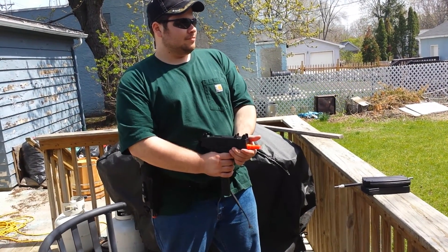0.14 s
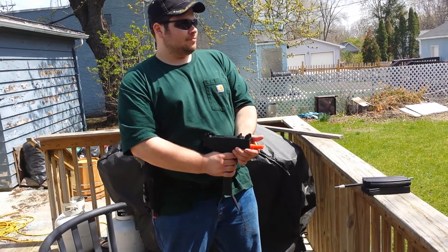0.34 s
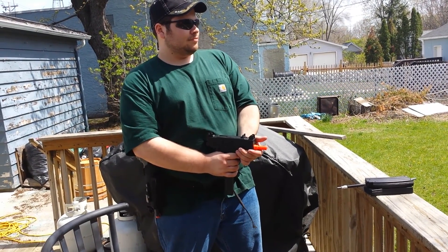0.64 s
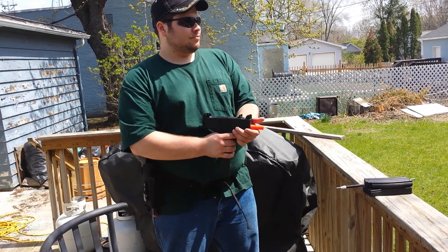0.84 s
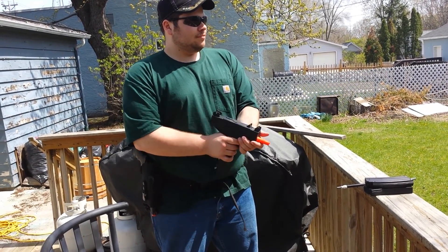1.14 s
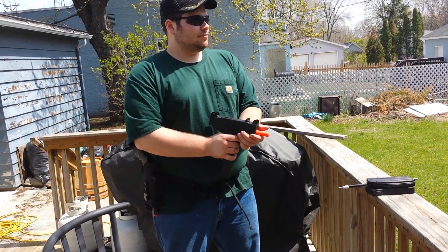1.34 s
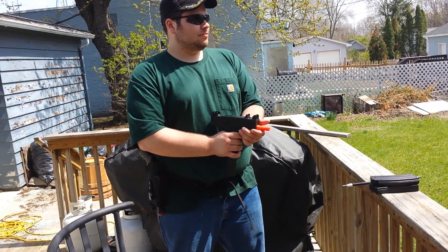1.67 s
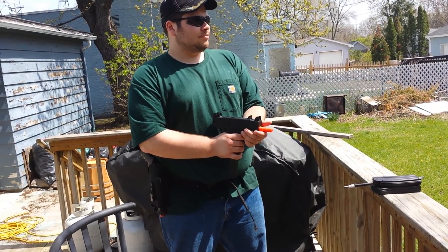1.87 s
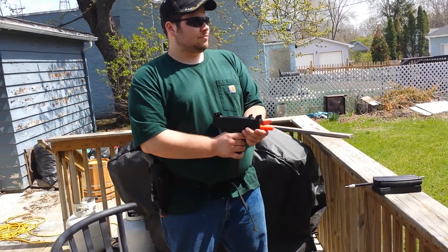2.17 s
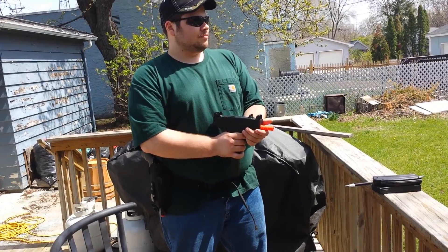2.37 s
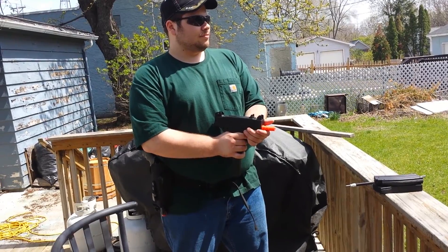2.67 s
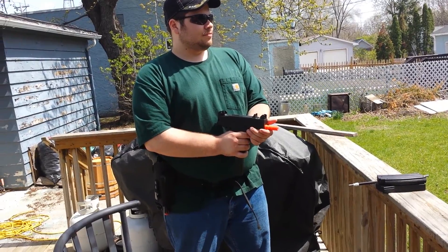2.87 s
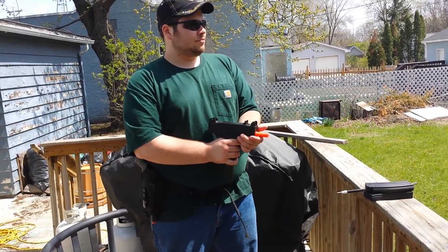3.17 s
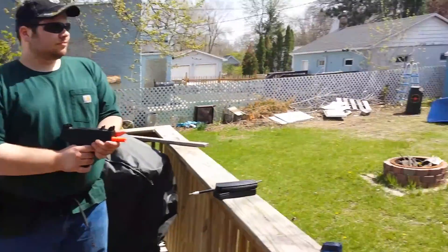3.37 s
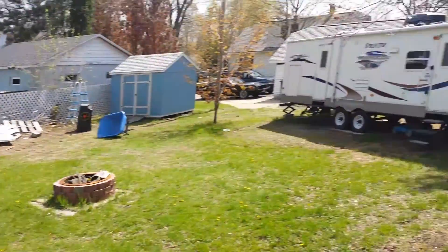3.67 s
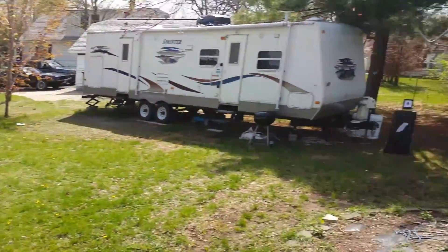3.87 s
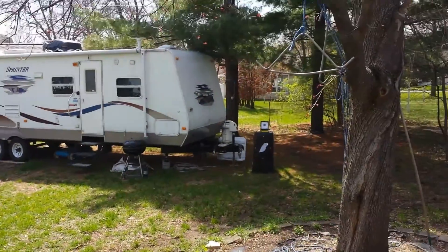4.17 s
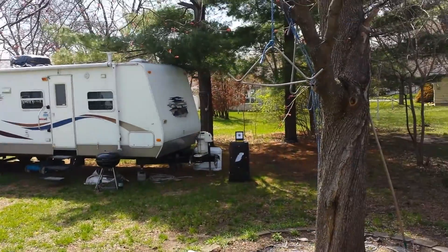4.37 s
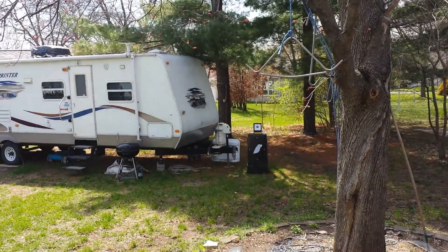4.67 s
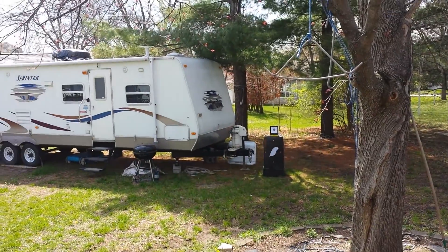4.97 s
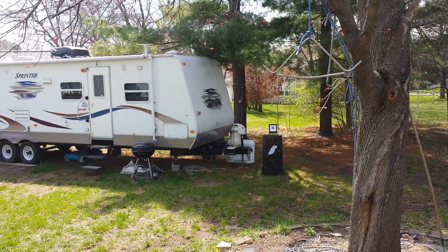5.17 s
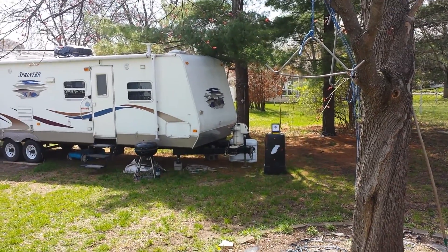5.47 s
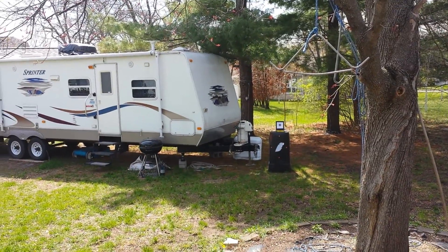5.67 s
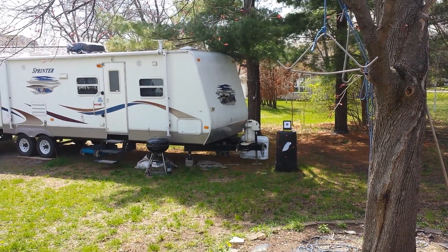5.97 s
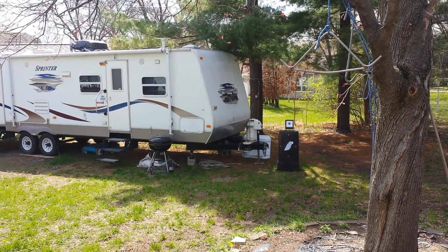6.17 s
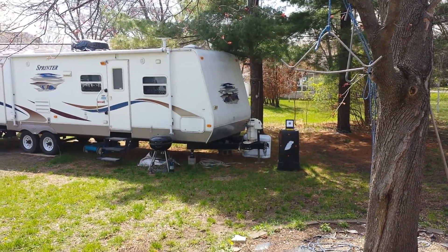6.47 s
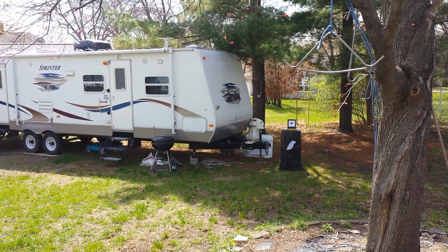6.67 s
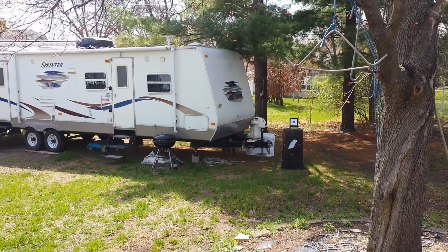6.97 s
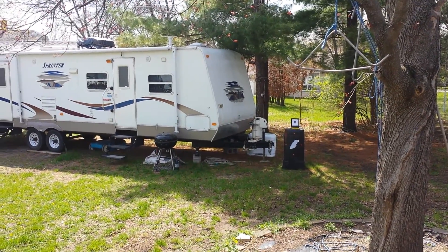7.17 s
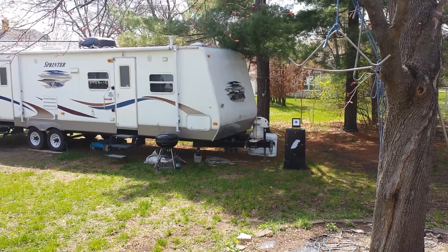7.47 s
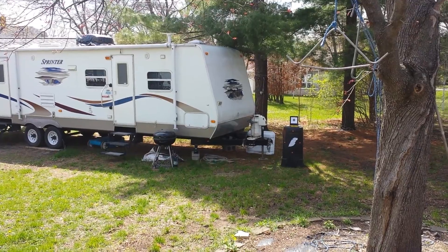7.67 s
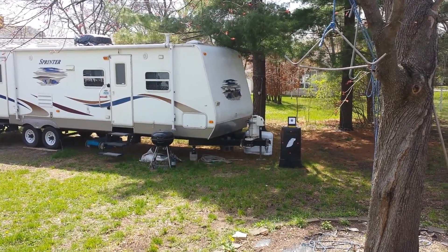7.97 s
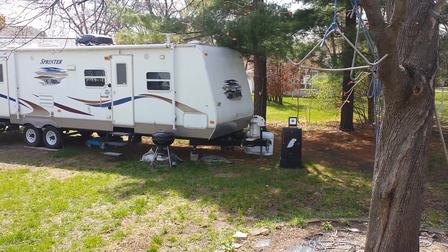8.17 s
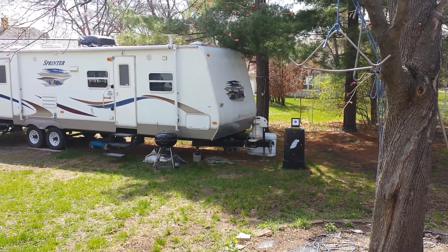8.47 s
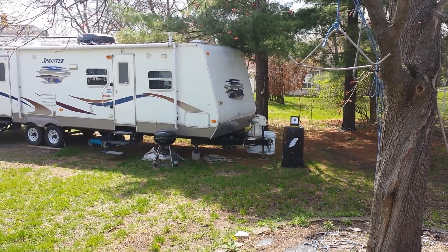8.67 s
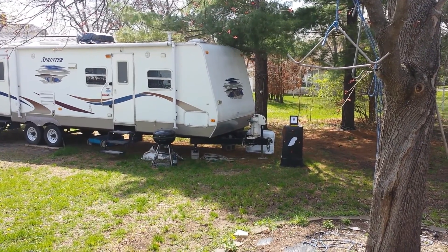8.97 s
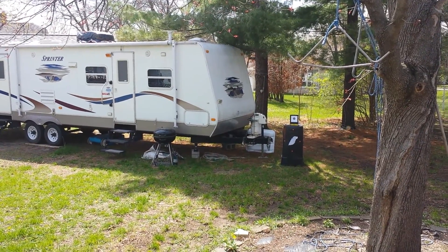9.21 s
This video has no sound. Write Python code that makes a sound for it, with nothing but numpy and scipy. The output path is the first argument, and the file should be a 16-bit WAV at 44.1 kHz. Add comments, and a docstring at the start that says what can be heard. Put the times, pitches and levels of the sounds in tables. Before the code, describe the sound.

Five bursts of toy-gun fire, the second by far the longest, separated by pauses under a second. Piston cracks ring through a plastic shell with nozzle clicks, chattering gear teeth and a nasal motor whine. Spinning gears hiss in the gaps, loudest in the first. Walls and trees give a short wash. The nearby camera turns from the gun around four seconds, dulling its edge and leaning the whine left; tiny hard ticks appear late.

```python
"""A deck in a backyard, where a small electric airsoft gun fires bursts at about eight shots a second.
In each cycle the gears whine while they wind the spring, the nozzle clicks and the piston slams home.
Walls, fence and trees return a diffuse wash; between bursts the gear train seems to spin free, hissing.
Midway the camera, with its two-port microphone, turns away from the gun. Gears, hiss and air are shaped
noise; clicks and shots are noise bursts ringing through resonances of the plastic shell."""
import sys
import numpy as np
from scipy import signal
from scipy.fft import rfft, irfft, next_fast_len
from scipy.io import wavfile
from scipy.ndimage import uniform_filter1d, map_coordinates

SR = 44100
rng = np.random.default_rng(int(sys.argv[2]) if len(sys.argv) > 2 else 0)


def generate_wav(sig):
    """Save sig (samples, or channels by samples) to the path in sys.argv[1] as 16-bit PCM at SR."""
    pcm = np.round(np.clip(np.atleast_2d(sig).T, -1, 1) * 32767).astype(np.int16)
    wavfile.write(sys.argv[1], SR, pcm)


N = 411978


def amp(db):
    """Decibels to gain."""
    return 10 ** (np.asarray(db) / 20)


def unit(x):
    """Scale to rms 1."""
    return x / np.sqrt(np.mean(x ** 2) + 1e-20)


def colour(points, hz):
    """Gain of (Hz, dB) points on a log frequency axis."""
    point_hz, db = np.transpose(points)
    return amp(np.interp(np.log(hz + 1), np.log(point_hz), db))


def curve(rows):
    """One value per sample from (s, value) rows."""
    return np.interp(np.arange(N) / SR, *np.transpose(rows))


def wobble(rate):
    """A smooth random curve with rate knots a second."""
    knots = rng.standard_normal(int(N * rate / SR) + 4)
    return map_coordinates(knots, [np.arange(N) * rate / SR])


def filtered(x, response):
    """x times a complex response of frequency."""
    size = next_fast_len(N + SR // 2)
    spectrum = rfft(x, size) * response(np.fft.rfftfreq(size, 1 / SR))
    return irfft(spectrum, size)[..., :N]


def ringing(modes, hz):
    """Causal response of (Hz, width Hz, dB) resonances, alternating in sign."""
    total = 0
    for k, (centre, width, db) in enumerate(modes):
        damping = 1j * hz * width
        total = total + (-1) ** k * amp(db) * damping / (centre * centre - hz * hz + damping)
    return total


def add(track, sound, s):
    """Mix a sound in from time s on."""
    start = round(s * SR)
    sound = sound[..., max(0, -start):N - start]
    track[..., max(0, start):max(0, start) + sound.shape[-1]] += sound


# Tone of the open air around the deck. Each row: frequency in Hz, level in dB.
AIR_COLOUR = [(25, -16), (100, -0.5), (200, -7), (500, -10), (1000, -9), (3000, -14), (7000, -8),
              (14000, -32)]
# Level of the background rumble over time, held lower during the long hiss.
# Each row: time in seconds, level in dB before a fixed gain.
AIR_LEVEL = [(0, -64), (1.1, -63), (1.35, -68), (1.65, -67), (1.9, -63), (3.5, -63), (4.5, -61.5),
             (9.34, -61.5)]


def air():
    """Faint open-air rumble and leaves: coloured noise, partly shared by both ports, slowly wavering."""
    shared, left, right = rng.standard_normal((3, N))
    noise = unit(filtered(shared + 0.63 * np.array([left, right]), lambda hz: colour(AIR_COLOUR, hz)))
    breeze_db = 2 * wobble(9)
    return amp(curve(AIR_LEVEL) + breeze_db + 5.55) * noise


# Sharp ticks, as of pellets striking something hard. Each row: start in seconds, level in dB.
PELLETS = [(8.844, -10.5), (9.098, -12), (9.2006, -4)]


def pellets(t60):
    """Thin, bright ticks: noise dying by 60 dB in t60 seconds, through three high resonances."""
    out = np.zeros((2, N))
    t = np.arange(SR // 25) / SR
    for s, db in PELLETS:
        add(out, amp(db - 60 * t / t60) * rng.standard_normal((2, len(t))), s)
    hard_surface = [(3070, 840, -4.5), (7400, 1100, 3), (10310, 4100, -5.5)]
    return filtered(out, lambda hz: ringing(hard_surface, hz))


def thump(s, db, hz, width, body_db):
    """A low, soft thump with one shot: a single swing of pressure and a shorter, higher knock."""
    t = np.arange(N) / SR - s

    def swing(times):
        """One sine swing under a bell, sped up by times."""
        return -np.sin(2 * np.pi * hz * times * t) * np.exp(-(t * times / width) ** 2)

    left_right_db = [[3], [-7]]
    return amp(db) * (swing(0.86) + amp(body_db) * swing(3.2)) * amp(left_right_db)


# Spells of free spinning between bursts. Each row: start in seconds, end in seconds, then the level
# at the start and at the end in dB, before the gains for facing and turned.
FREE_SPIN = [(1.125, 1.196, -46, -58.5), (1.246, 1.673, -29.5, -36.5), (4.922, 5.261, -37.5, -42),
             (6.916, 7.272, -37, -39), (8.18, 8.437, -44.5, -41)]
SPIN_RISE_S, SPIN_DROP_DB, SPIN_TAIL_T60 = 0.055, -2.5, 0.41  # swell, step at the end, 60 dB tail in s


def spin_level():
    """Each spell of free spinning swells, sags slowly, then drops to a fading echo."""
    t = np.arange(N) / SR
    level = 0
    for start, end, start_db, end_db in FREE_SPIN:
        swell = np.clip((t - start) / SPIN_RISE_S, 0, 1)
        sag_db = curve([(start, start_db), (end, end_db)])
        tail_db = (t > end) * (SPIN_DROP_DB - 60 * (t - end) / SPIN_TAIL_T60)
        level = level + swell * amp(sag_db + tail_db)
    return level


# Tone of the rasp with the gun in front of the microphone. Each row: frequency in Hz, level in dB.
RASP_FRONT = [(300, -68), (700, -47), (1100, -20), (1700, -20), (2200, -6), (2800, -20), (3900, -20),
              (5300, -4), (6400, -1.5), (7600, -6.5), (9000, -11.5), (12000, -15.5), (15000, -26)]
# Tone of the rasp with the gun behind it. Each row: frequency in Hz, level in dB.
RASP_BEHIND = [(300, -20.5), (700, -26), (1000, -14.5), (1600, -14), (2150, 0.5), (2700, -5), (3400, -13.5),
               (4100, -10.5), (4550, -0.5), (5000, -3), (6500, 2.5), (7600, -3.5), (8400, 0.5), (9500, -7),
               (15000, -17.5)]


def free_spin(turned, flutter_db, surge_db):
    """Unloaded gears skim their teeth in a fluttering hiss, made of coloured noise."""
    level = spin_level() * amp(surge_db * wobble(22))
    shared, left, right = rng.standard_normal((3, N))
    sides = np.array([left, right])
    front = unit(filtered(shared + 1.23 * sides, lambda hz: colour(RASP_FRONT, hz)))
    behind = unit(filtered(sides, lambda hz: colour(RASP_BEHIND, hz)))
    hiss = amp(5.0) * (1 - turned) * front + amp(6.0) * turned * behind
    return level * amp(flutter_db * wobble(120)) * hiss


# Trigger pulls. Each row: first click, first shot and last shot in seconds, gear whine in dB before
# the motor's other gains, unloaded mesh pitch in Hz. The shots between are evenly spaced.
BURSTS = [(-0.02, 0.0018, 0.961, -43, 2345), (1.9208, 1.9577, 4.8501, -38.5, 2325),
          (5.452, 5.479, 6.8082, -41.5, 2250), (7.3205, 7.3484, 8.0786, -41, 2277),
          (8.5009, 8.5311, 9.2609, -41, 2234)]
CYCLE_S = 0.121  # one turn of the gearbox, roughly
CLICK_LEAD_S = 0.023  # after the first shot, the nozzle clicks this long before the piston lands


def cycles():
    """The gearbox turns at a steady rate through each burst: rows of (click s, shot s)."""
    rows = []
    for first_click, first, last, *_ in BURSTS:
        shots = np.linspace(first, last, round((last - first) / CYCLE_S) + 1)
        clicks = np.append(first_click, shots[1:] - CLICK_LEAD_S)
        rows += zip(clicks, shots)
    return np.array(rows)


# Loudness of the gun at the camera, for motor and blows. Each row: time in seconds, level in dB.
GUN_LEVEL = [(0, 0), (3.4, -0.5), (3.75, -0.6), (4.1, -3), (4.4, -4.5), (4.85, -5), (5.8, -2), (6.8, -2),
             (7.7, -3.7), (9.3, -2.5)]
RUN_ON_S, MOTOR_RISE_S, MOTOR_FALL_S = 0.071, 0.05, 0.024  # run-on after the last shot, start, stop


def motor_level():
    """The motor starts with the first click of a burst and runs on briefly after the last shot."""
    t = np.arange(N) / SR
    running = 0
    for start, _, last, db, _ in BURSTS:
        rise = np.clip((t - start) / MOTOR_RISE_S, 0, 1)
        fall = np.clip(1 - (t - last - RUN_ON_S) / MOTOR_FALL_S, 0, 1)
        running = running + amp(db) * rise * fall
    return running * amp(curve(GUN_LEVEL))


GEAR_TURN_S, GEAR_TIGHT_S = 0.034, 0.04  # off-centre gear: one turn, tightest mesh before the shot


def gears(turned, sag, width_hz, load_db, ripple_db, waver):
    """A rough mesh tone that sinks and swells as the spring is wound, and recovers at each shot."""
    t = np.arange(N) / SR
    fired = cycles()[:, 1]
    to_next = np.append(fired, 100)[np.searchsorted(fired, t)] - t  # seconds to the next shot
    load = uniform_filter1d(np.clip(1.3 - to_next / .11, 0, 1), size=200)
    # the off-centre gear makes level and pitch swing a few times a cycle
    tight = np.cos(2 * np.pi * (to_next - GEAR_TIGHT_S) / GEAR_TURN_S)
    free_hz = curve([(s, hz) for start, _, last, _, hz in BURSTS for s in (start, last)])
    phase = 2 * np.pi * np.cumsum(free_hz * (1 - sag * load - waver * tight)) / SR
    # uneven teeth spread the tone into a narrow band
    teeth = unit(filtered(rng.standard_normal((2, 3, N)), lambda hz: 1 / (1 + (hz / width_hz) ** 2)))
    shared, left, right = unit(teeth[0] * np.cos(phase) + teeth[1] * np.sin(phase))
    # the whine leans to the left port, more so once turned
    lean = amp(np.array([[1], [-1]]) * (2.0 + 4.2 * turned))
    whine = unit(shared + 0.21 * np.array([left, right])) * lean
    # the housing hums under the gears
    hum_modes = [(533, 57, -7.0), (1146, 33, -2.0)]
    housing = unit(filtered(rng.standard_normal(N), lambda hz: ringing(hum_modes, hz)))
    flutter_db = 2 * wobble(70)
    level = motor_level() * amp(load_db * (load - 4.0) + ripple_db * tight + flutter_db)
    return level * (amp(9.0) * whine + amp(-15 + 10.4 * turned) * housing)


# Resonances of the plastic shell and gearbox. Each row: frequency in Hz, width in Hz, level in dB.
SHELL = [(236, 183, -26.5), (352, 95, -19.5), (543, 109, -22), (698, 164, -20), (1041, 126, -8.5),
         (1343, 280, -14.5), (1893, 221, -7), (2417, 285, -13), (3420, 850, -17), (4510, 357, -9.5),
         (5640, 630, -1.5), (6533, 655, 1), (7540, 1025, -6), (8590, 580, -10.5), (9430, 2000, -15.5)]


def teeth_clatter(turned, rate, size_db, t60):
    """Gear teeth tick unevenly against the shell while the motor runs: random decaying noise ticks."""
    sizes = np.minimum(rng.exponential(size=N), 3)
    ticks = (rng.random(N) < rate / SR) * amp(size_db * sizes)
    decay = amp(-60 * np.arange(SR // 50) / SR / t60)
    envelope = signal.fftconvolve(ticks, decay)[:N]
    rattle = unit(filtered(envelope * rng.standard_normal((2, N)), lambda hz: ringing(SHELL, hz)))
    return motor_level() * amp(2.0 + 1.0 * turned) * rattle


# A struck part hits, then hits again. Each row: nominal delay in seconds, level in dB.
BOUNCES = [(0, 0), (.0019, -9), (.0048, -17)]


def blows(events, crack_db, crack_t60, rattle_t60, spread, blunting_db):
    """Each contact is a hard crack that bounces, then a dying rattle, ringing through the shell."""
    lead = SR // 125  # samples of build-up before contact
    t = (np.arange(SR // 20) - lead) / SR
    force, knock = np.zeros((2, 2, N))
    for s, db, knock_db, rise_ms in events:
        shared, left, right, grit = rng.standard_normal((4, len(t)))
        hits = 0
        for delay, hit_db in BOUNCES:
            age = t - delay * rng.uniform(.8, 1.2)
            hits = hits + (age >= 0) * amp(hit_db - 60 * np.abs(age) / crack_t60)
        crack = unit(grit * hits)
        rise = np.exp(np.minimum(t, 0) * 1000 / max(rise_ms, .05))
        fall = amp(-60 * np.maximum(t, 0) / rattle_t60)
        # hands, railing and deck scatter the rattle differently into each port
        rattle = unit(rise * fall * (shared + spread * np.array([left, right])))
        # a slower rise takes the edge off the crack
        push = amp(db) * unit(amp(crack_db - blunting_db * rise_ms) * crack + rattle)
        add(force, push, s - lead / SR)
        # the low resonances feel mostly one clean shove
        shove = amp(db - 3.5) * np.sqrt(len(t)) * (t == 0)
        add(knock, (shove + amp(-6) * push) * amp(knock_db), s - lead / SR)
    low = filtered(knock, lambda hz: ringing(SHELL[:6], hz))
    high = filtered(force, lambda hz: ringing(SHELL[6:], hz))
    return low + high


# A cycle is clean unless listed in these two. Dull: the piston lands softly, with a knock.
# Each entry: time of the cycle in seconds.
DULL_AT = [0.12, 0.96, 1.96, 2.08, 2.32, 3.16, 3.65, 3.89, 4.85, 5.48, 5.6, 5.72, 5.96, 7.35, 7.96, 8.53,
           8.78, 8.9]
# Faint click: hardly a click, then an ordinary shot. Each entry: time of the cycle in seconds.
FAINT_CLICK_AT = [0.6, 2.2, 2.92, 3.04, 3.77, 4.25, 4.37, 4.61, 4.73, 5.84, 7.59, 7.84]
BEHIND_KNOCK_DB, BEHIND_RISE_MS = -1, 0.24  # blows are thinner and blunter from behind the camera
SCATTER_DB, KNOCK_SCATTER_DB = 0.5, 0.14  # chance from blow to blow


def strokes(times, kinds):
    """The kind of cycle sets each blow: rows of (s, level dB, knock dB, rise ms)."""
    def listed(marks):
        """True for times within half a cycle of a mark."""
        return np.abs(times[:, None] - marks).min(axis=1) < CYCLE_S / 2

    kind = listed(DULL_AT) + 2 * listed(FAINT_CLICK_AT)
    db, knock_db, rise_ms = np.array(kinds)[kind].T
    turned = np.interp(times, *np.transpose(TURN))
    gun_db = np.interp(times, *np.transpose(GUN_LEVEL))
    chance = rng.standard_normal((len(times), 2))
    level_db = db + gun_db + SCATTER_DB * chance[:, 0]
    knock_db = knock_db + BEHIND_KNOCK_DB * turned + KNOCK_SCATTER_DB * chance[:, 1]
    return np.transpose([times, level_db, knock_db, rise_ms + BEHIND_RISE_MS * turned])


def ports(x, table, lag_ms):
    """Each microphone port has its own colour; the left one hears the gun lag_ms later."""
    table = np.array(table)

    def response(hz):
        """Left and right colour, the left delayed."""
        lag = np.exp(-2j * np.pi * hz * lag_ms / 1000)
        return np.array([colour(table[:, [0, 1]], hz) * lag, colour(table[:, [0, 2]], hz)])

    return filtered(x, response)


# Tone of the yard's echo with the gun in front. Each row: frequency in Hz, level in dB.
ECHO_FRONT = [(200, -42), (600, -27), (1100, -9), (1600, -10.5), (2100, -4), (2900, -15.5), (4300, -11),
              (5500, -2.5), (7000, -2), (8600, -10), (11500, -11.5), (15000, -29)]
# Tone of the yard's echo with the gun behind. Each row: frequency in Hz, level in dB.
ECHO_BEHIND = [(200, -27.5), (550, -13.5), (750, -14.5), (1200, -10.5), (2000, -1.5), (3300, -4.5),
               (4000, -6), (4550, -2), (5000, -3.5), (6400, 1.5), (7600, -1.5), (8400, -0.5), (9500, -7.5),
               (15000, -20.5)]


def yard(x, turned, t60, early_db, early_t60, treble_t60):
    """Walls, fence and trees return the energy of each blow as a diffuse wash whose treble dies first."""
    t = np.arange(SR * 3 // 4) / SR

    def wash(points):
        """Coloured noise, partly shared by the ports until the camera turns."""
        noise = rng.standard_normal(N) * (1 - turned) + rng.standard_normal((2, N))
        return unit(filtered(noise, lambda hz: colour(points, hz)))

    front = np.sqrt(1 - turned) * wash(ECHO_FRONT)
    noise = front + np.sqrt(turned) * amp(5.0) * wash(ECHO_BEHIND)
    treble = filtered(noise, lambda hz: hz ** 4 / (hz ** 4 + 8000 ** 4))
    energy = np.mean(x ** 2, axis=0)
    out = 0
    for band, life in ((noise - treble, t60), (treble, treble_t60)):
        decay = amp(-60 * t / life) + amp(early_db - 60 * t / early_t60)
        fade = (decay * (1 - np.exp(-t / 0.00067))) ** 2
        out = out + band * np.sqrt(np.abs(signal.fftconvolve(energy, fade / fade.sum())[:N]))
    return out * amp(1.8 * wobble(150))


# Piston blow in a clean, a dull and a faint-click cycle, before gun level, scatter and turning.
# Each row: level in dB, knock in dB, rise in milliseconds.
PISTON = [(-8.5, 1, 0.75), (-12, 6.5, 1.48), (-8.5, 1, 0.93)]
# Nozzle click in a clean, a dull and a faint-click cycle, before the same changes.
# Each row: level in dB, knock in dB, rise in milliseconds.
NOZZLE = [(-14.5, -1.1, 0.49), (-15.5, 3.6, 1.2), (-29.5, 8, 3)]
# Faint nozzle clicks in the pauses. Each row: time in seconds, level in dB, knock in dB, rise in ms.
LONE_CLICKS = [(5.2542, -25.5, -7, 0.32), (6.9492, -26, 5, 0.8)]
# Microphone colour with the gun in front. Each row: frequency in Hz, left port in dB, right port in dB.
FACING = [(200, 2, 0), (540, -2, -4), (720, 3, 1), (1100, 1, -1), (1900, 0, -2), (2300, 4, 1),
          (3200, 1, -4), (4500, -3, 0), (5600, 0, 1), (6600, 3, -4), (7600, -1, 0), (9300, -9, 4),
          (12000, -1, 1), (15000, -3, -1)]
# Microphone colour with the gun behind. Each row: frequency in Hz, left port in dB, right port in dB.
TURNED = [(200, 4, 3), (380, 5, 3), (550, 12, 9), (750, 2, 0), (1100, 2, -3), (2000, 4, -3), (3200, 4, 1),
          (4500, 4, 4), (5600, 0, -4), (6600, -1, -6), (7800, -6, 5), (9300, -10, 4), (12000, -4, 1),
          (15000, -4, -3)]
CRACK_DB, BLUNTING_DB = 7, 7  # crack over rattle, and its loss per ms of rise


def gun(turned):
    """Nozzle clicks and piston shots, heard direct and echoed by the yard."""
    click_s, shot_s = cycles().T
    shots = blows(strokes(shot_s, PISTON), crack_db=CRACK_DB, crack_t60=0.0062,
                  rattle_t60=0.046, spread=1.0, blunting_db=BLUNTING_DB)
    clicks = blows([*strokes(click_s, NOZZLE), *LONE_CLICKS], crack_db=CRACK_DB, crack_t60=0.002,
                   rattle_t60=0.031, spread=1.0, blunting_db=BLUNTING_DB)
    close = shots + clicks
    front = (1 - turned) * ports(close, FACING, lag_ms=0)
    behind = turned * amp(1.0) * ports(close, TURNED, lag_ms=0.4496)
    echo = yard(shots + 0.6 * clicks, turned, t60=0.47, early_db=17.0, early_t60=0.014, treble_t60=0.28)
    # the right port picks up more of the echo's top
    top = filtered(echo, lambda hz: np.exp(-((hz - 9000) / 1600) ** 2))
    return front + behind + amp(-9.0) * (echo + 0.71 * np.array([[-1], [1]]) * top)


# The camera turning away from the gun. Each row: time in seconds, share turned away from 0 to 1.
TURN = [(3.55, 0.042), (4.0, 1)]


def scene():
    """The gun and its yard, heard from a turning camera."""
    turned = curve(TURN)
    background = air() + pellets(t60=0.019)
    low_thump = thump(s=2.9232, db=-24.5, hz=105, width=.0032, body_db=-2)
    spin = free_spin(turned, flutter_db=1.67, surge_db=1.07)
    whine = gears(turned, sag=.14, width_hz=130, load_db=4, ripple_db=2.5, waver=.025)
    clatter = teeth_clatter(turned, rate=64, size_db=4.0, t60=0.057)
    return background + low_thump + spin + whine + clatter + gun(turned)


TOP_HZ = 14700  # the camera's band limit


def record(dry):
    """The hardest cracks overload the camera, which keeps almost nothing above its band limit."""
    clipped = dry / (1 + np.abs(dry) ** 8) ** (1 / 8)
    return filtered(clipped, lambda hz: 1 / np.sqrt(1 + (hz / TOP_HZ) ** 110))


dry = scene()
out = record(dry)
generate_wav(out)
```